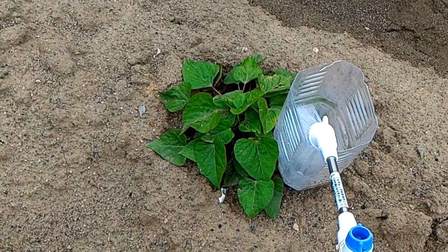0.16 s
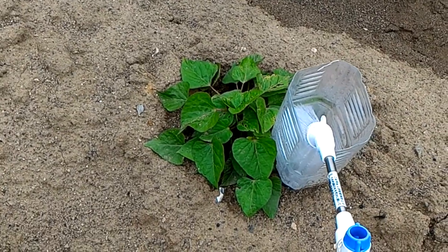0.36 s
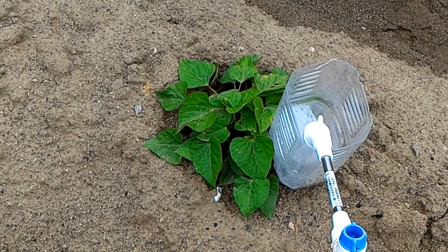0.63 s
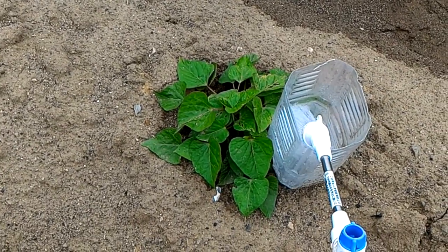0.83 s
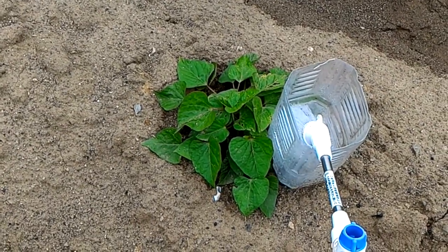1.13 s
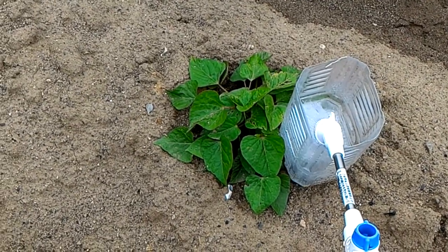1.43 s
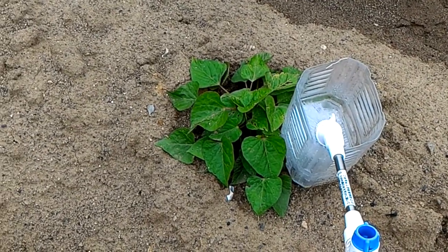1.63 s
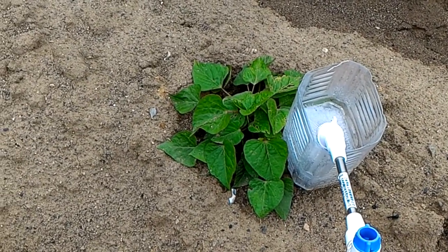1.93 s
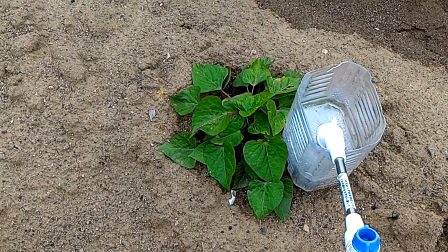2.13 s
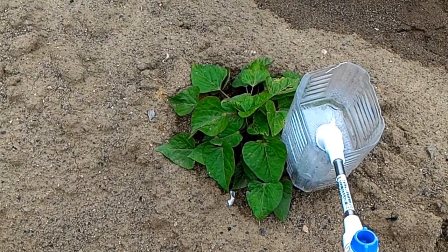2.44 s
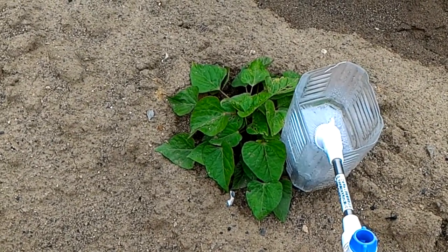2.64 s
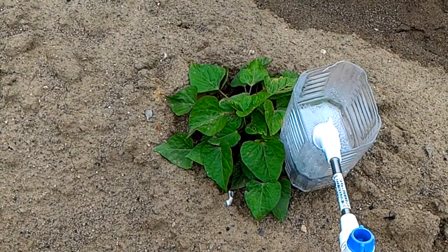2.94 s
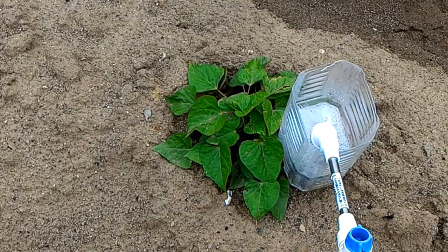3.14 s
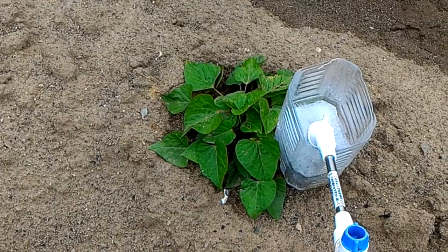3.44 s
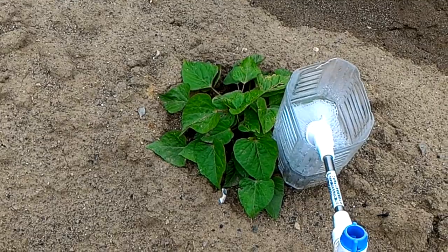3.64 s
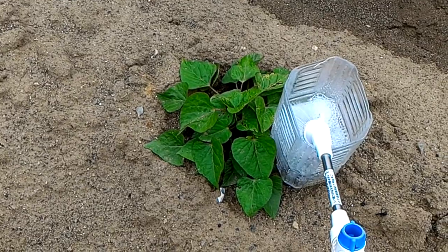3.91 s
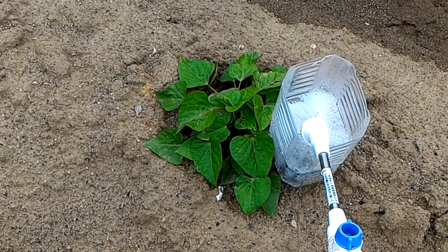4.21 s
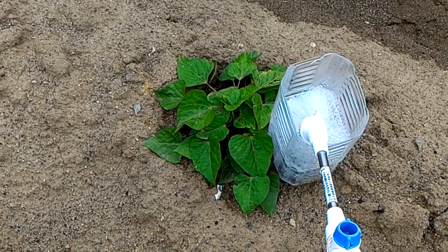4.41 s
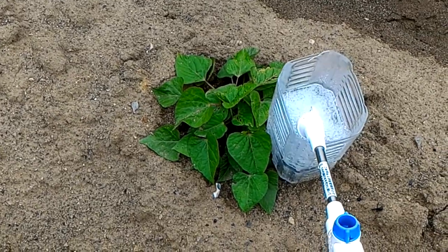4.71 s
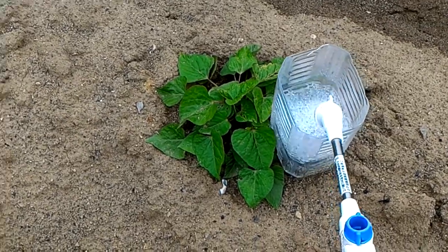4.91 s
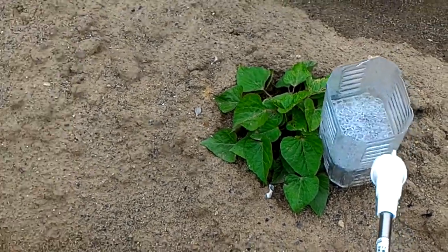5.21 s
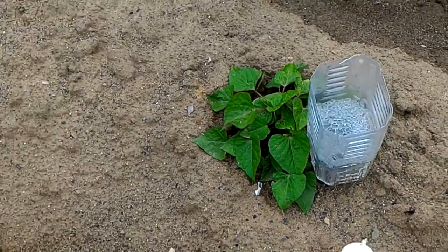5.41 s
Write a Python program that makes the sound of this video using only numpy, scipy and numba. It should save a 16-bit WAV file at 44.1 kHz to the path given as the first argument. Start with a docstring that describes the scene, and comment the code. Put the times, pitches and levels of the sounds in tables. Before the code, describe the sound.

From the very start a watering nozzle sprays strongly into a cut-off plastic bottle standing in soil outdoors. A dense, bright hiss of fine spray lies over a rough, hollow splashing whose plastic resonances flutter and shift slowly as the water rises. The sound is close, dry and mono, slightly nasal, with little very high treble. It stays nearly steady, weakening a little towards the end. Light wind makes faint low rumble, with a soft low thud and puff around 3.3 s and another swell near 3.9 s. At about 4.6 s the valve snaps shut with a sharp knock and the jet dies almost instantly. Much quieter foam fizz remains, with a couple of drips until 4.85 s. Small ticks and scuffs come around 4.95-5.25 s, then a crisp rustle and knock peak near 5.3 s as the lance is drawn away, with dull hollow bumps around 5.4 s and a last one near 5.5 s.

```python
"""A watering nozzle sprays into a cut-off plastic bottle standing in garden soil, until the valve shuts.
Random droplet impacts ring the bottle's shifting resonances and hiss through its short cross modes.
Low filtered noise makes the light wind; damped tones make a low thud, then drips and hollow bumps.
From the valve's shutting on, noise bursts knock, impacts fizz as foam, and the lance rustles and scuffs.
Spray, foam, knocks and scuffs pass through the colour of a resonant microphone housing."""
import sys
import numpy as np
from scipy import signal
from scipy.fft import rfft, irfft
from scipy.io import wavfile
from numba import njit

SR = 44100
rng = np.random.default_rng(int(sys.argv[2]) if len(sys.argv) > 2 else 0)


def voltage_ratio(decibels):
    """Convert decibels (scalar or array-like) to amplitude ratios, 20 dB per decade."""
    exponent = np.asarray(decibels, float) / 20
    return 10 ** exponent


def pcm_store(signal):
    """Save signal as 16-bit PCM."""
    levels = np.round(np.clip(np.atleast_2d(signal), -1, 1) * 32767)
    wavfile.write(sys.argv[1], SR, levels.astype(np.int16).T)


N = 245195  # length in samples

# Jet, weakening a little as the bottle fills. Each row: time in seconds, splash level in dB, hiss level in dB.
JET_LEVELS = [(0.0, -26, -31), (0.85, -27.5, -29), (2.0, -26.5, -30.5), (3.0, -28, -30.5),
              (3.6, -27, -30.5), (4.1, -29.5, -30), (4.45, -30.5, -32), (4.62, -30.5, -32.5)]
SHUT_S, DIE_DB_PER_S = 4.622, 531  # the valve shuts, and how fast the jet then dies
# Resonances of bottle wall and air. Each row: pitch at the start in Hz, pitch when full in Hz, width in Hz,
# then relative level in dB at 0, 1/3, 2/3 and all of the filling.
BOTTLE_MODES = [(274, 312.5, 45, -13, -9, -17.5, -15), (463, 494, 58, -12, -5.5, -10.5, -55),
                (598, 596, 76, -19, -7, -8, -5.5), (536, 680, 81, -17.5, -10.5, -9.5, -10),
                (746, 751, 81, -16, -10.5, -9, -17), (973, 924, 120, -5, -13, -13, -56),
                (1052, 1101, 48, -6, -5, -5, -13), (1257, 1283, 155, -3, -14.5, -16, -11),
                (1440, 1533, 240, -9, -6, -5.5, -11.5), (1642, 1736, 267, -9, -8.5, -5, -5),
                (1912, 1763, 104, -3, -6, -9, -5.5), (2113, 2018, 120, -7, -6, -11, -6.5),
                (2425, 2410, 216, -17, -15, -14.5, -6.5)]
# Short modes across the bottle. Each row: pitch in Hz, width in Hz, level against the plain hiss in dB.
CROSS_MODES = [(2780, 140, -5.5), (3336, 390, 11), (5010, 210, -1), (5710, 540, 4.5), (6620, 840, 8.5),
               (7610, 420, 2.5), (8072, 410, 8.5), (9330, 500, 5.5), (10700, 600, -20), (12700, 520, 2)]
ECHO_S, ECHO_SHARE = 0.0003148, 0.62  # mean delay and strength of the near-wall echo
THRUM_DB, THRUM_FADE_DB = -60, 7  # drumming on the floor, and its loss by the time the bottle is full
# Wind on the microphone port. Each row: time in seconds, level of the slow heave in dB.
WIND_HEAVE = [(0.0, -49.5), (1.2, -51.5), (1.67, -47.5), (2.5, -50), (3.0, -47.5), (3.24, -46), (3.3, -33),
              (3.4, -47.5), (3.72, -48), (3.92, -39.5), (4.25, -52), (4.41, -45.5), (4.94, -53.5),
              (5.24, -51), (5.56, -52)]
CALM_DB = -50  # heave level that counts as calm air
# Level in calm air, and share of the heave's swing in dB that is followed
RUMBLE_DB, RUMBLE_FOLLOWS = -54.5, 0.61
BUFFET_DB, BUFFET_FOLLOWS = -61.5, 0.6
# Microphone in its housing. Each row: frequency in Hz, gain in dB.
HOUSING_RESPONSE = [(200, -1.5), (1000, -0.5), (1500, 2.5), (1900, 8), (2500, -2), (2900, -1), (3060, -5),
                    (3250, 0.5), (3900, -9.5), (4400, -9), (4800, 0), (5900, 1), (8100, -2.5), (8800, -10),
                    (9600, -11.5), (9950, -22), (10400, -19.5), (11600, -28), (12800, -21.5), (15700, -19)]
# A low thud during the spray, then drips and hollow bumps after the valve shuts.
# Each row: start in seconds, level in dB, pitch in Hz, 60 dB decay in seconds.
TONAL_BLIPS = [(3.285, -35, 133, .16), (4.64, -43, 625, .15), (4.729, -40, 1970, 0.038),
               (4.812, -52, 630, .08), (4.826, -53, 600, 0.081), (5.087, -51, 330, 0.056),
               (5.335, -49, 402, .1), (5.400, -49, 500, .08), (5.413, -37.5, 222, 0.062),
               (5.427, -37, 187, 0.038), (5.448, -46, 466, 0.051), (5.533, -42, 320, 0.052)]
# Valve, drops and knocks of the lance. Each row: start in seconds, level before filtering in dB,
# decay time constant in seconds, treble against the dull part in dB.
KNOCK_HITS = [(4.619, -13.5, 0.0061, -5), (4.669, -38, .003, 2), (4.959, -36, .0015, -5),
              (5.153, -42, .003, -8.5), (5.224, -44, 0.0044, -7), (5.286, -32, .002, -9),
              (5.293, -41, .003, -4), (5.42, -40, .004, -8), (5.482, -50, .006, -12)]
FOAM_TREBLE_DB, FOAM_MIDDLE_DB, FOAM_LOW_DB = -61.5, -57, -62  # steady fizz after the valve
# Rustle as the lance is drawn away. Each row: time in seconds, treble level in dB.
RUSTLE_LEVELS = [(5.2, -78), (5.235, -56), (5.27, -51), (5.305, -47.5), (5.34, -51.5), (5.385, -57),
                 (5.415, -51.5), (5.49, -57.5), (5.56, -55)]
RUSTLE_UPPER_DB, RUSTLE_MIDDLE_DB, RUSTLE_LOW_DB = -5, -2, -8  # against its treble
# Lance brushing the rim and leaves. Each row: start in seconds, end in seconds, level in dB.
SCUFF_STROKES = [(5.064, 5.1, -45), (5.147, 5.167, -52), (5.225, 5.246, -51), (5.26, 5.281, -50),
                 (5.284, 5.305, -50), (5.402, 5.428, -50)]


def in_time(rows):
    """Draw the columns of a table as curves, one value per sample."""
    seconds, *columns = np.transpose(rows)
    return [np.interp(np.arange(N) / SR, seconds, column) for column in columns]


def colour(x, points):
    """Minimum-phase filter through (Hz, dB) points, made by folding the cepstrum to its causal half."""
    hz, db = np.transpose(points)
    size = 8192
    bin_hz = np.arange(size // 2 + 1) * SR / size
    gain_db = np.interp(np.log(bin_hz + 1), np.log(hz), db)
    cepstrum = irfft(np.log(voltage_ratio(gain_db)))
    cepstrum[1:size // 2] *= 2
    cepstrum[size // 2 + 1:] = 0
    impulse = irfft(np.exp(rfft(cepstrum)))
    return signal.fftconvolve(x, impulse)[:N]


def band(x, low_hz, high_hz):
    """Third-order Butterworth band-pass."""
    return signal.sosfilt(signal.butter(3, [low_hz, high_hz], "band", fs=SR, output="sos"), x)


def level(x, low_hz, high_hz):
    """One band of the signal, set to rms 1."""
    x = band(x, low_hz, high_hz)
    return x / np.std(x)


def heard(x, low_hz, high_hz):
    """Pass a sound through the housing, scaled to rms 1 within the given band."""
    x = colour(x, HOUSING_RESPONSE)
    return x / np.std(band(x, low_hz, high_hz))


def drift(rate_hz):
    """Slow random wander of spread 1: noise through two equal low-pass poles, drawn every 40 samples."""
    r = np.exp(-80 * np.pi * rate_hz / SR)
    noise = rng.standard_normal(N // 40 + 2002)
    slow = signal.lfilter([1], [1, -2 * r, r * r], noise)[2000:]  # skip the filter's start-up
    return np.interp(np.arange(N) / 40, np.arange(len(slow)), slow / np.std(slow))


def droplets(per_s, spread_db):
    """Impacts at random moments, of uneven size and sign, set to rms 1."""
    sizes = voltage_ratio(spread_db * np.minimum(rng.exponential(1, N), 5)) * rng.standard_normal(N)
    x = sizes * (rng.random(N) < per_s / SR)
    return x / np.std(x)


@njit
def resonate(x, turn, r):
    """Two-pole resonance of gain about 1 whose centre (radians a sample) may move."""
    y = np.zeros(len(x))
    for i in range(2, len(x)):
        y[i] = (1 - r * r) / 2 * (x[i] - x[i - 2]) + 2 * r * np.cos(turn[i]) * y[i - 1] - r * r * y[i - 2]
    return y


def mode(x, hz, width_hz):
    """Ring one resonance; a narrower width rings longer."""
    return resonate(x, 2 * np.pi * hz / SR * np.ones(N), np.exp(-np.pi * width_hz / SR))


def splash(fill):
    """Drops drive each resonance of the bottle; each swells and fades by itself as the water churns."""
    out = np.zeros(N)
    drops = [droplets(9000, 2.4), droplets(9000, 1.35)]  # two streams take alternate modes
    for k, (start_hz, full_hz, width_hz, *levels_db) in enumerate(BOTTLE_MODES):
        filled_hz = start_hz + (full_hz - start_hz) * fill
        hz = filled_hz * (1 + 0.016 * drift(3.26))
        narrow = mode(drops[k % 2], hz, width_hz)
        rung = mode(narrow, hz, 2.05 * width_hz)  # second pass steepens the skirts
        mode_db = np.interp(fill, np.linspace(0, 1, len(levels_db)), levels_db)
        out += rung * voltage_ratio(mode_db + 0.88 * drift(6.8))
    return heard(out, 1200, 2500)


def hiss():
    """Fine spray in the cross modes; an inverted echo off the near wall cuts regular notches."""
    fine = droplets(20000, 0.71) * voltage_ratio(0.5 * drift(77))
    spray = fine.copy()
    for hz, width_hz, db in CROSS_MODES:
        moving_hz = hz * (1 + 0.0088 * drift(3.2))
        spray += mode(fine, moving_hz, width_hz) * voltage_ratio(db + drift(34))
    at = np.arange(N)
    delay = ECHO_S * SR * (1 + 0.0098 * drift(0.27))
    echo = np.interp(at - delay, at, spray)
    notched = spray - ECHO_SHARE * echo
    return heard(band(notched, 840, 22000), 4500, 9000)  # fine spray has no bass


def thrum(fill):
    """Dull noise of the jet drumming on the bottle floor, damped as water covers it."""
    return voltage_ratio(THRUM_DB - THRUM_FADE_DB * fill) * level(rng.standard_normal(N), 103, 199)


def jet():
    """Splash, hiss and thrum share the gusts of the flow and die away when the valve shuts."""
    splash_db, hiss_db = in_time(JET_LEVELS)
    t = np.arange(N) / SR
    fill = np.clip(t / SHUT_S, 0, 1)
    flow_db = 0.29 * drift(30) - DIE_DB_PER_S * np.maximum(t - SHUT_S, 0)
    return voltage_ratio(flow_db) * (voltage_ratio(splash_db) * splash(fill) + voltage_ratio(hiss_db) * hiss() + thrum(fill))


def wind():
    """Turbulence on the port in three ranges, from slow heave to buffeting, all swelling with the gusts."""
    heave_db, = in_time(WIND_HEAVE)
    gust_db = heave_db - CALM_DB
    air = rng.standard_normal((3, N))
    lumps = voltage_ratio(drift(8.5))
    heave = voltage_ratio(heave_db) * level(air[0], 13.0, 47.3)
    rumble = voltage_ratio(RUMBLE_DB + RUMBLE_FOLLOWS * gust_db) * level(air[1], 42.0, 105)
    buffet = voltage_ratio(BUFFET_DB + BUFFET_FOLLOWS * gust_db) * level(air[2], 67, 222)
    return lumps * (heave + rumble + buffet)


def tonal_blips():
    """Thud, drips and hollow bumps: each is one damped sine tone with a 2.5 ms attack."""
    out, t = np.zeros(N), np.arange(N) / SR
    for start_s, level_db, hz, t60_s in TONAL_BLIPS:
        age = np.maximum(t - start_s, 0)
        envelope = voltage_ratio(level_db - 60 * age / t60_s) * np.minimum(age / 0.0025, 1)
        out += envelope * np.sin(2 * np.pi * hz * age)
    return out


def knocks():
    """Each is a click and a dying burst of noise, the treble set by the hardness of the contact."""
    t, noise = np.arange(N) / SR, rng.standard_normal(N)
    dull, bright = np.zeros(N), np.zeros(N)
    for start_s, level_db, decay_s, treble_db in KNOCK_HITS:
        age = np.maximum(t - start_s, 0)
        burst = (age > 0) * np.exp(-age / decay_s) * noise
        burst[round(start_s * SR)] += 4.0  # the click
        dull += voltage_ratio(level_db) * burst
        bright += voltage_ratio(level_db + treble_db) * burst
    return colour(band(dull, 390, 3600) + band(bright, 3600, 14000), HOUSING_RESPONSE)


def foam_and_rustle():
    """Impacts of bursting foam and the moved lance, in three streams; one rings the bottle faintly."""
    rustle_db, = in_time(RUSTLE_LEVELS)
    fade = np.clip((np.arange(N) / SR - SHUT_S) / 0.02, 0, 1)  # enters as the valve shuts
    treble_stream, middle_stream, low_stream = (droplets(5000, 0.88) for _ in range(3))
    treble = heard(band(treble_stream, 3500, 11000), 4500, 9000)
    bottle_ring = voltage_ratio(-6) * mode(middle_stream, 1900, 250)
    middle = heard(band(middle_stream, 1000, 3600) + bottle_ring, 1200, 2800)
    low = level(low_stream, 210, 1000)
    upper = heard(band(low_stream, 2300, 3700), 2300, 3700)  # crisp part just under the treble
    sway = voltage_ratio(0.72 * drift(26))
    # foam and rustle add as powers in each shared range
    treble_gain = np.hypot(voltage_ratio(FOAM_TREBLE_DB), voltage_ratio(rustle_db))
    middle_gain = np.hypot(voltage_ratio(FOAM_MIDDLE_DB), voltage_ratio(rustle_db + RUSTLE_MIDDLE_DB))
    low_gain = np.hypot(voltage_ratio(FOAM_LOW_DB), voltage_ratio(rustle_db + RUSTLE_LOW_DB))
    upper_gain = voltage_ratio(rustle_db + RUSTLE_UPPER_DB)
    return fade * sway * (treble_gain * treble + middle_gain * middle + low_gain * low + upper_gain * upper)


def scuff():
    """Short dense runs of scratches: band-limited random impacts under quick fades."""
    t = np.arange(N) / SR
    strokes = np.zeros(N)
    for start_s, end_s, db in SCUFF_STROKES:
        fade_in = np.clip((t - start_s) / 0.011, 0, 1)
        fade_out = np.clip((end_s - t) / 0.0044, 0, 1)
        strokes += voltage_ratio(db) * fade_in * fade_out
    scratches = band(droplets(7000, 1.5), 1140, 2250)
    return strokes * heard(scratches, 1200, 2800)


def scene():
    """Mix all sources to one channel."""
    mix = jet() + wind() + tonal_blips() + knocks() + foam_and_rustle() + scuff()
    return mix[None]


def roll_off(x):
    """The treble ends steeply here."""
    return signal.sosfilt(signal.butter(12, 15730, fs=SR, output="sos"), x)


def record(dry):
    """Hand over the finished mix."""
    return roll_off(dry)


dry = scene()
out = record(dry)
pcm_store(out)
```